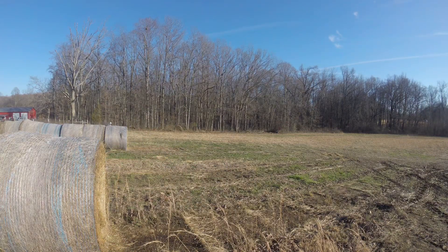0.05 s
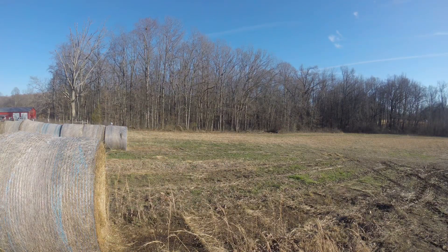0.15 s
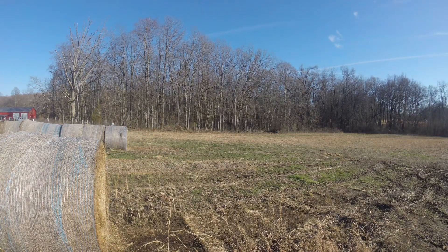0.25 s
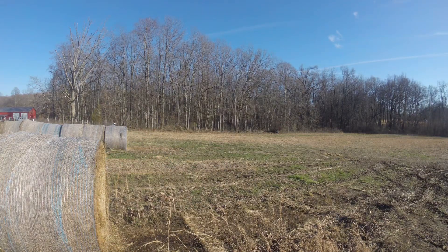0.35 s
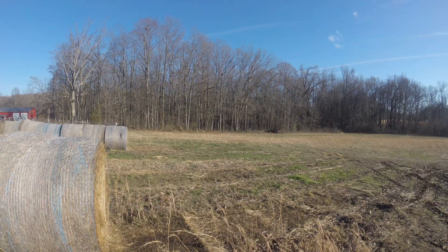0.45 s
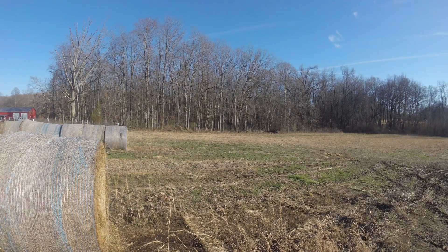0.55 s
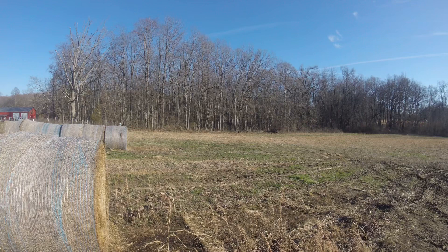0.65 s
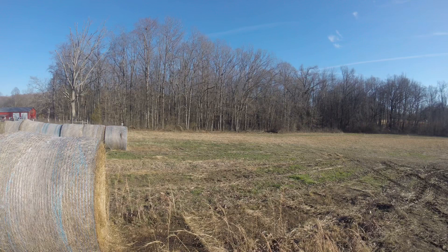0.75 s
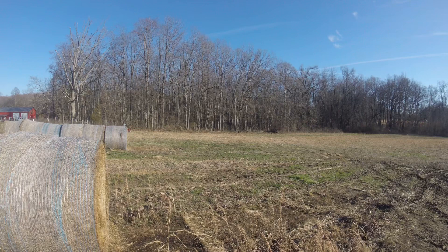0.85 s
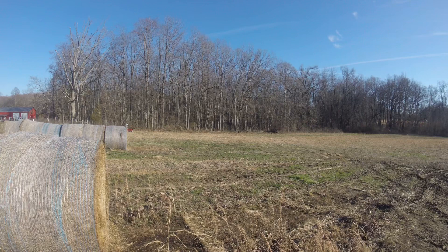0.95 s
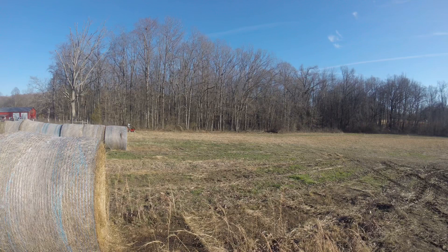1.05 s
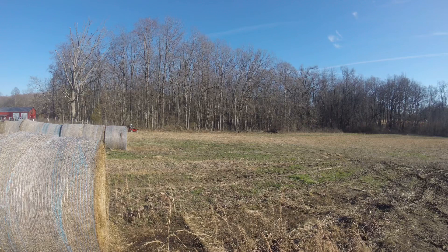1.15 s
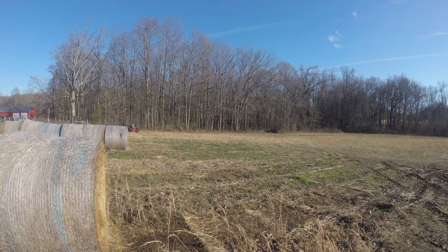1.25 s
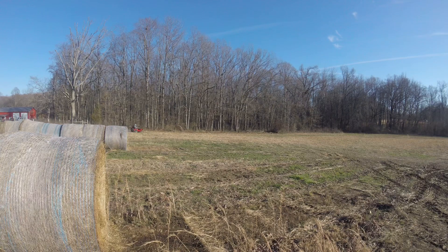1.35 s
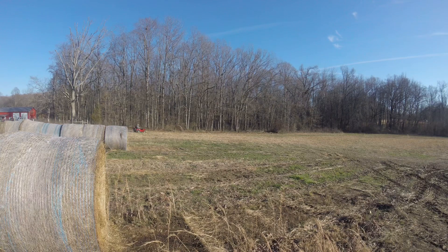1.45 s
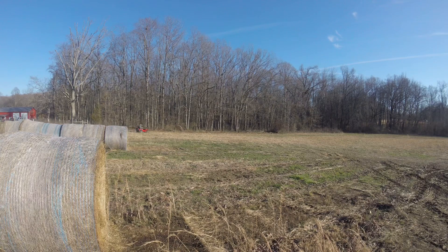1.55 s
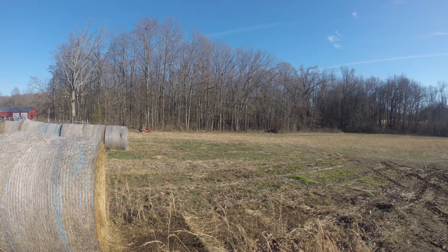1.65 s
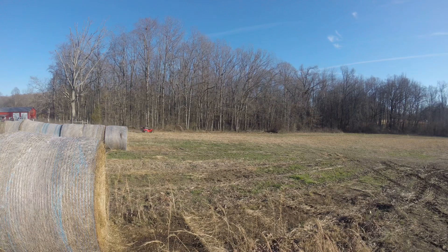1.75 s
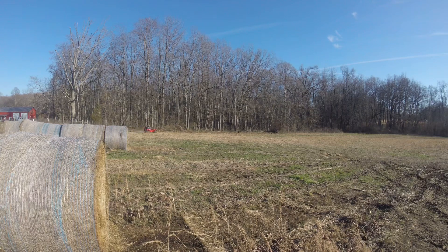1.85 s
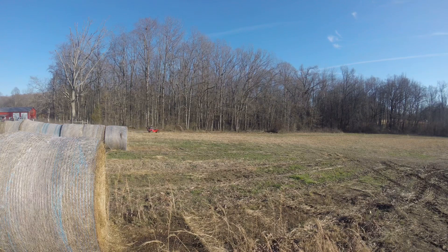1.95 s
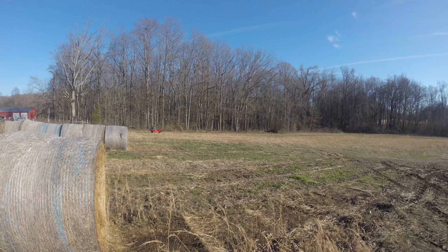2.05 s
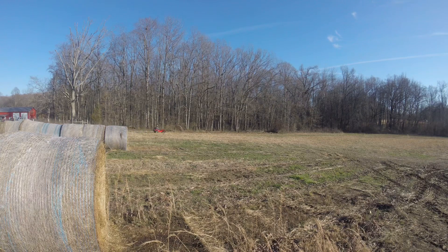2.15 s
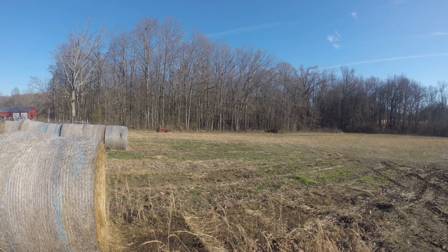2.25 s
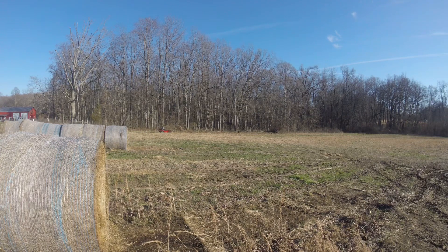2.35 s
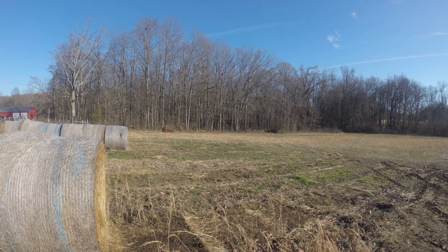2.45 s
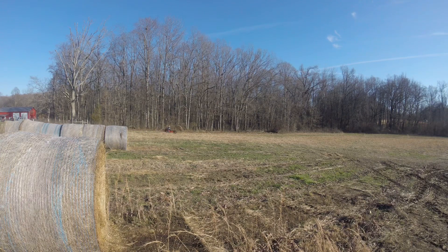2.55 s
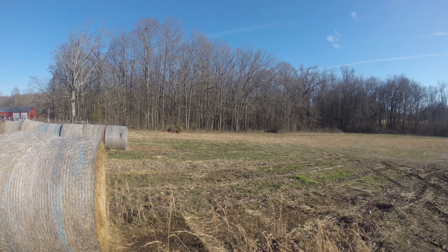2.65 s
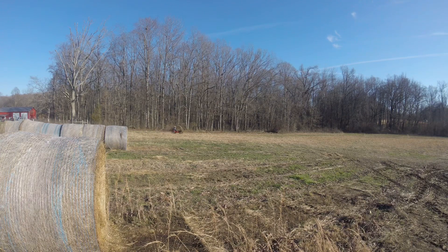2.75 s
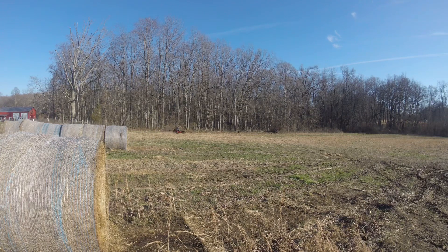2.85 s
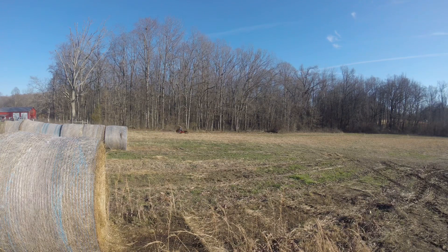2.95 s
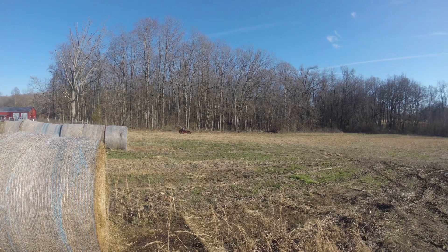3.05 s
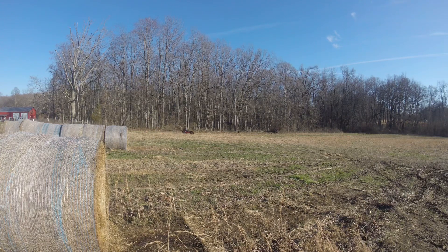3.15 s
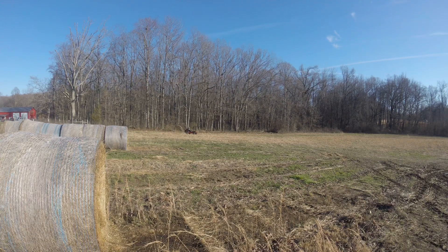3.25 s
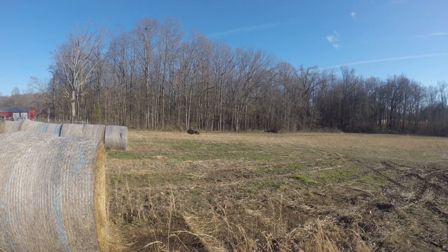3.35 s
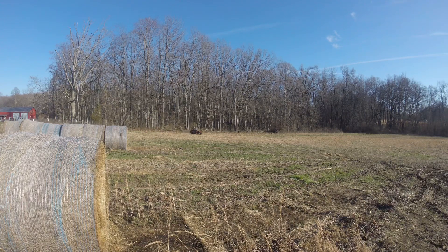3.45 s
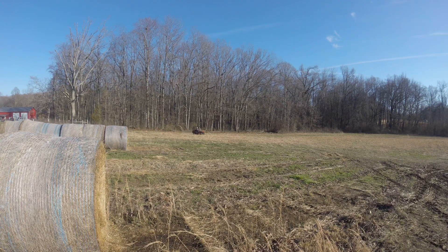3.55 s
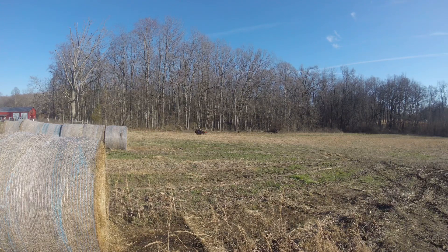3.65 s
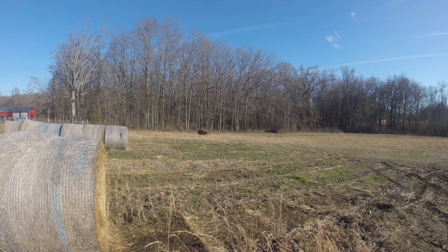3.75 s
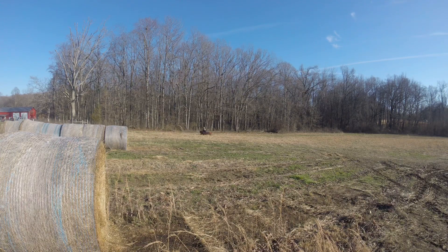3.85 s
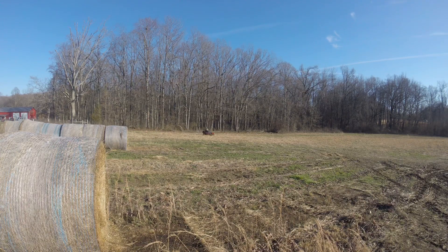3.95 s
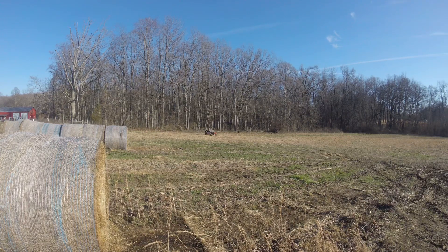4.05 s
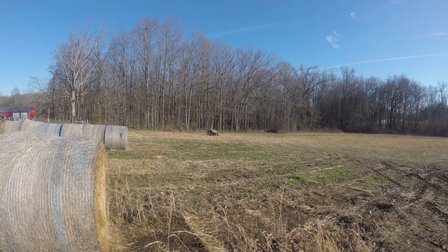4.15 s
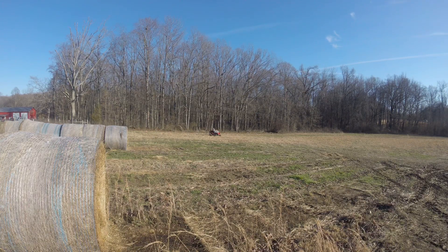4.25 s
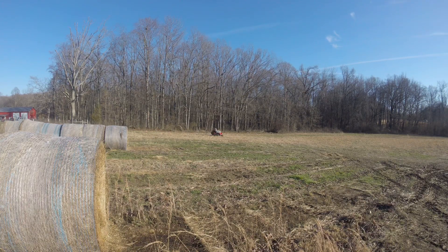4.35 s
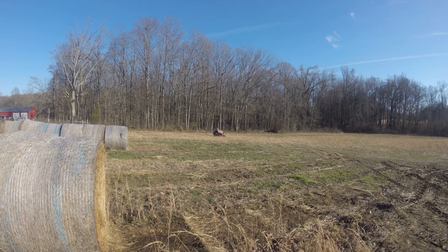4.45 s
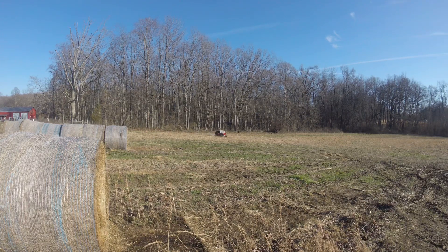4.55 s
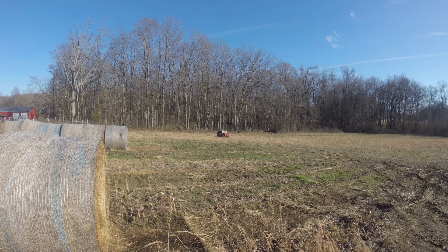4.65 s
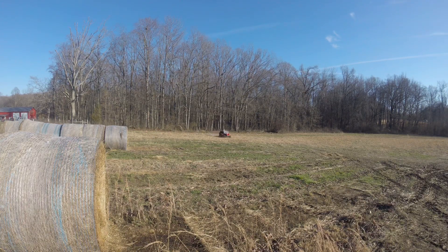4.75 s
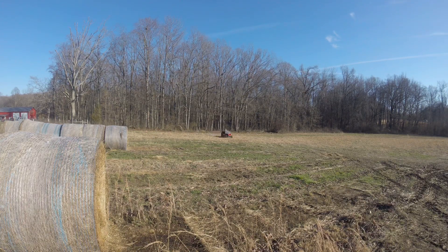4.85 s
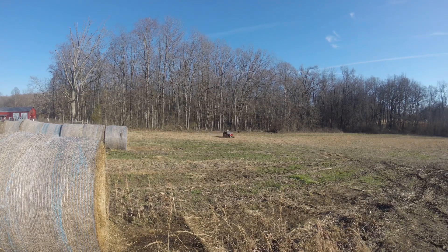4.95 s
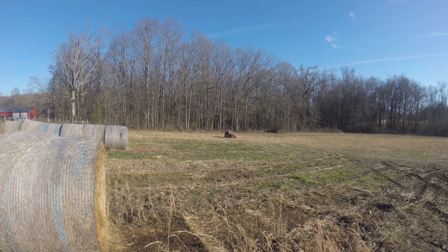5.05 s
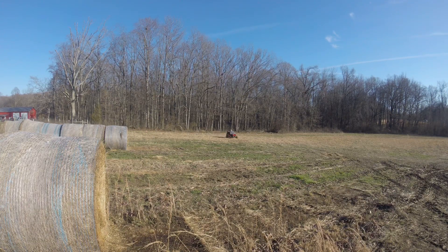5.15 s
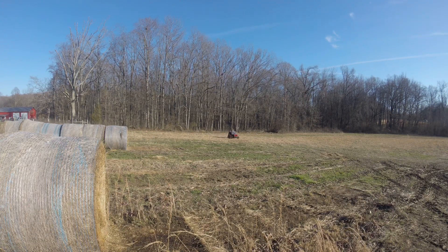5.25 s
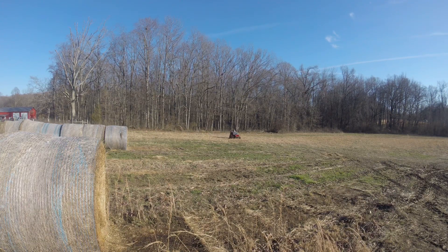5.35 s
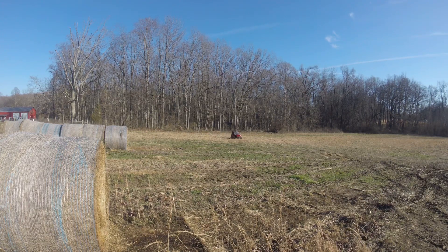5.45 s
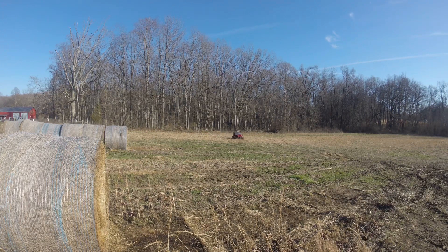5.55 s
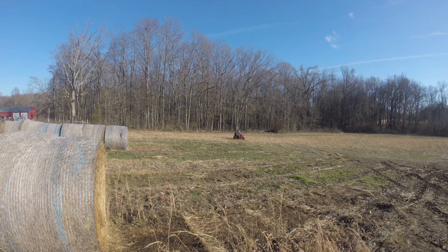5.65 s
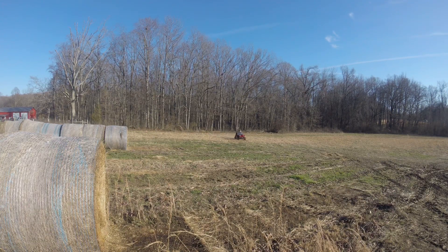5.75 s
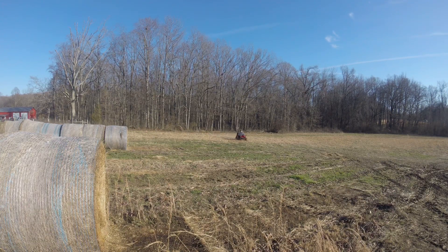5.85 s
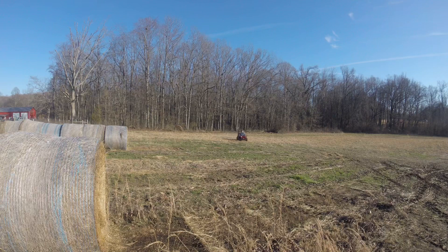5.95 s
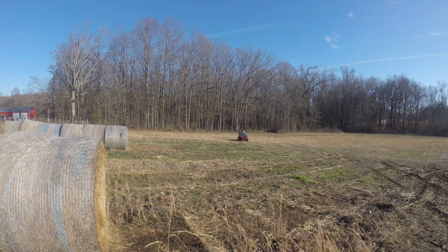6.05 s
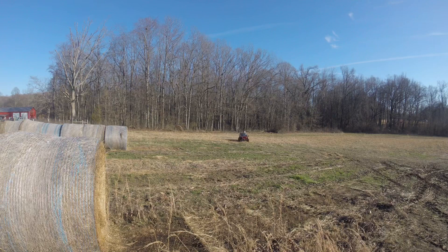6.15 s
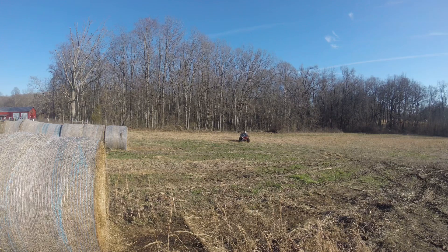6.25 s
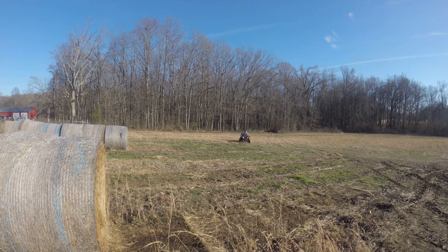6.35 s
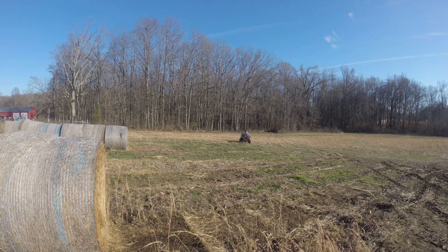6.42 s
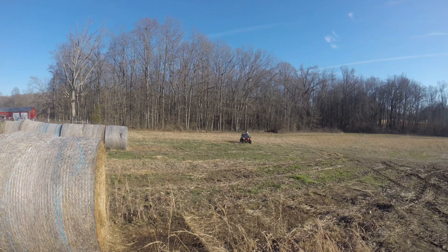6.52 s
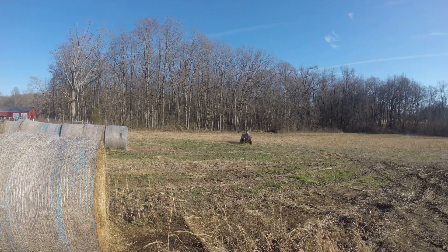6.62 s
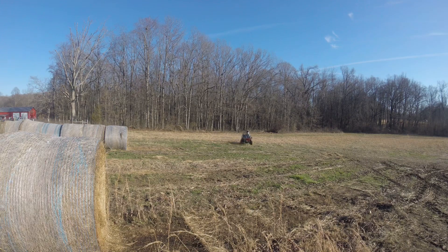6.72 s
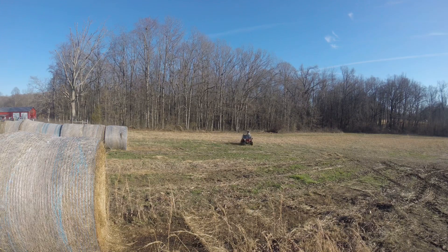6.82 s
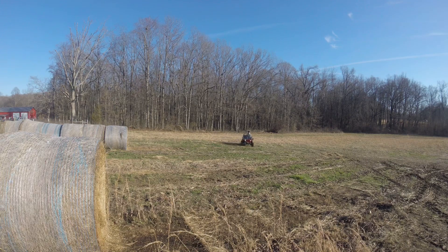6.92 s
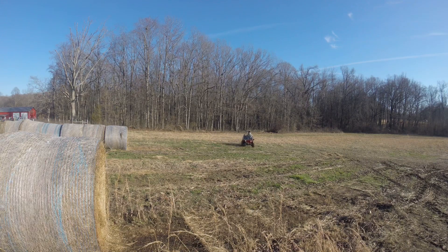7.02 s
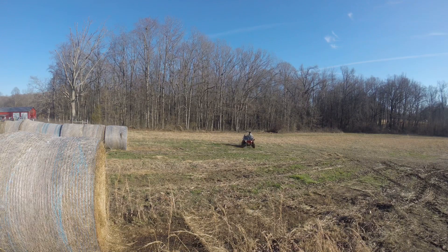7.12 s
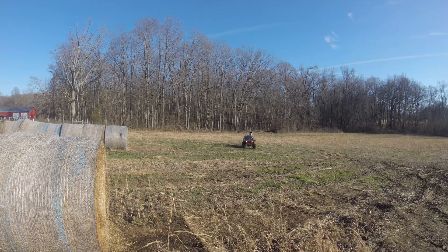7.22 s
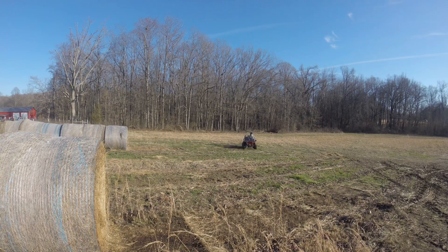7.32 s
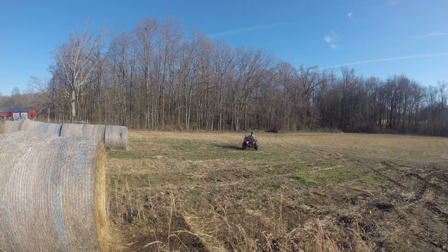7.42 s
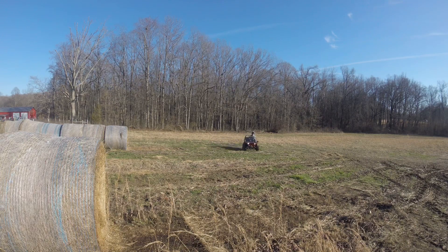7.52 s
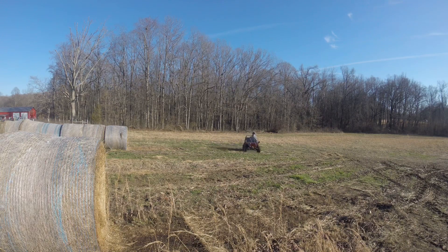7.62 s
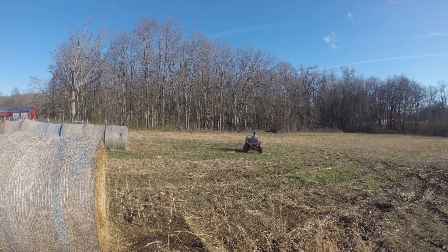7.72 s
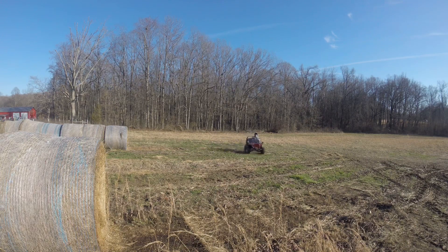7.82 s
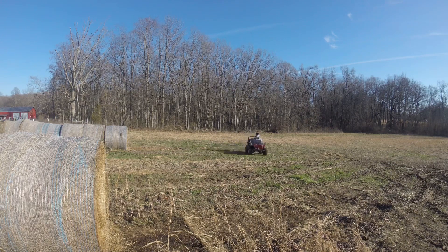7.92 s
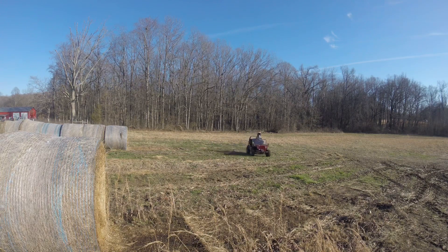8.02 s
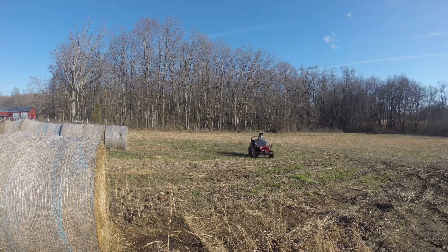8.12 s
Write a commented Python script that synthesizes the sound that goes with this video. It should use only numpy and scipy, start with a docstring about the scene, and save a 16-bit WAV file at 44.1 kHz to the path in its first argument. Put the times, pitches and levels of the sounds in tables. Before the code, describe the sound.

Distant quad engine putters unevenly over ruts, sagging and flaring, then revs higher and comes closer with swelling bass, rasp and mechanical hiss.

```python
"""Single-cylinder quad bike engine: it rounds a tree line on a soft field, turns and drives towards a small camera.
Each firing thumps through the exhaust as phase-locked orders plus gas roar, bass and rumble.
Cylinder rasp, intake hiss and tyre fizz are filtered noise that beats once a cycle; a valve tick rings.
The camera's low cut holds the bass down until the engine is close. Quiet field air lies beneath."""
import sys
import numpy as np
from scipy import signal
from scipy.fft import rfft, irfft, next_fast_len
from scipy.io import wavfile
from scipy.ndimage import uniform_filter1d, map_coordinates

SR = 44100
rng = np.random.default_rng(int(sys.argv[2]) if len(sys.argv) > 2 else 0)


def to_wav(sig):
    """Store sig (one row per channel, or 1-D mono) as 16-bit WAV at the path in sys.argv[1].

    Samples outside -1..1 are clipped; the rate is SR.
    """
    pcm = np.clip(np.atleast_2d(sig), -1, 1) * 32767
    pcm = np.round(pcm).astype(np.int16)
    wavfile.write(sys.argv[1], SR, pcm.T)  # frames by channels


N = 360738
TIME_S = np.arange(N) / SR


def amp(db):
    """Gain of a level in dB."""
    return 10 ** (np.asarray(db) / 20)


def unit(x):
    """x scaled to rms 1."""
    return x / np.sqrt(np.mean(x ** 2) + 1e-20)


def steady(x):
    """x with its level over several firings held at rms 1."""
    power = uniform_filter1d(uniform_filter1d(x ** 2, size=9000), size=9000)
    return x / np.sqrt(np.abs(power) + 1e-12)


def curves(rows):
    """One value per sample for each column after the time."""
    start_s, *columns = np.transpose(rows)
    return [np.interp(TIME_S, start_s, column) for column in columns]


def wobble(rate_hz):
    """Smooth random curve, rate_hz knots a second."""
    knots = rng.standard_normal(int(N * rate_hz / SR) + 4)
    return map_coordinates(knots, [np.arange(N) * rate_hz / SR])


def bump(events, width_s, late_s=0):
    """Bell of the given height at each event."""
    return sum(height * np.exp(-((TIME_S - start_s - late_s) / width_s) ** 2) for start_s, height in events)


def coloured(x, points):
    """x through the causal minimum-phase filter with the (Hz, dB) points as its gain."""
    m = 2 * next_fast_len(N // 2 + SR // 2)
    freq_hz, gain_db = np.transpose(points)
    bins_hz = np.fft.rfftfreq(m, 1 / SR)
    gain = amp(np.interp(np.log(bins_hz + 1), np.log(freq_hz + 1), gain_db))
    # folding the cepstrum forward makes the filter causal
    ceps = irfft(np.log(gain + 1e-4), m)
    ceps[1:m // 2] *= 2
    ceps[m // 2 + 1:] = 0
    return irfft(rfft(x, m) * np.exp(rfft(ceps)), m)[:N]


def patchy(depth_db):
    """White noise with time-frequency patches of random gain."""
    z = signal.stft(rng.standard_normal(N), nperseg=512)[2]
    field = rng.standard_normal(z.shape)
    field = uniform_filter1d(uniform_filter1d(field, size=6, axis=0), size=12, axis=1)
    return signal.istft(z * amp(depth_db * unit(field)), nperseg=512)[1][:N]


def per_firing(cycle):
    """New random number for each engine cycle, changing softly between the puffs."""
    draw = rng.standard_normal(int(cycle[-1]) + 2)[np.round(cycle).astype(int)]
    return uniform_filter1d(draw, size=250)


# engine speed, sagging and flaring as the wheels meet ruts: [start_s, firing_hz]
ENGINE_SPEED = [(0, 44.6), (.13, 46.2), (.27, 45.2), (.39, 41.23), (.49, 43.77), (.59, 41.7), (.72, 42.3),
                (.98, 41), (1.09, 43.14), (1.48, 44.28), (1.6, 38.77), (1.79, 44.83), (2.23, 42.88),
                (2.35, 47.4), (2.45, 39.2), (2.6, 45.28), (2.98, 44.14), (3.13, 45.1), (3.29, 39.2),
                (3.45, 47.46), (3.67, 41.77), (3.89, 44.4), (3.97, 38.43), (4.01, 39.2), (4.1, 44.22),
                (4.31, 39.82), (4.54, 44.03), (4.68, 40.98), (4.9, 45.96), (5.0, 43.48), (5.22, 46.73),
                (5.38, 45.96), (5.58, 49.8), (5.67, 48.43), (5.9, 49.35), (6.0, 48.36), (6.11, 50.5),
                (6.29, 51.1), (6.52, 49.98), (6.67, 54.6), (6.79, 50.45), (6.88, 50.6), (6.99, 53.29),
                (7.22, 54.6), (7.34, 52.9), (7.45, 54.62), (7.56, 52.95), (7.7, 54.21), (7.88, 54.48),
                (7.97, 50.84), (8.18, 51.47)]
CRUISE_MEAN_S, RISE_MEAN_S = 0.43, 0.098


def engine():
    """Speed in Hz, its excess over the running mean in Hz, and its smoothed rise in Hz a second."""
    speed_hz = curves(ENGINE_SPEED)[0]
    surge_hz = speed_hz - uniform_filter1d(speed_hz, round(CRUISE_MEAN_S * SR))
    rise_hz_per_s = uniform_filter1d(np.gradient(speed_hz) * SR, round(RISE_MEAN_S * SR))
    return speed_hz, surge_hz, rise_hz_per_s


# relative order levels as the bike changes heading, each: [order, relative_db]
HIDDEN_ORDERS = [(3, -7.5), (4, 3.5), (5, 1.5), (6, -2), (7, -4.5), (8, -15), (9, -35), (10, -33),
                 (11, -44), (12, -49)]
CROSSING_ORDERS = [(3, -17), (4, 0), (5, 6), (6, 1), (7, -3.5), (8, -13), (9, -23), (10, -18), (11, -27.5),
                   (12, -32.5)]
TURNING_ORDERS = [(3, -11.5), (4, -2.5), (5, 0), (6, -2), (7, -11), (8, -24), (9, -14.5), (10, -19),
                  (11, -28.5), (12, -17.5), (13, -19.5), (14, -32)]
COMING_ORDERS = [(3, 0.5), (4, 0), (5, -8), (6, 0.5), (7, -14), (8, -8.5), (9, -10), (10, -19.5),
                 (11, -21.5), (12, -22), (13, -21.5), (14, -29), (15, -32), (16, -33), (17, -22), (18, -20),
                 (19, -18), (20, -29), (21, -27), (22, -32)]
CLOSE_ORDERS = [(3, -7), (4, -6), (5, -6.5), (6, -8), (7, -8.5), (8, -18.5), (9, -17), (10, -16),
                (11, -25.5), (12, -31), (13, -31.5), (14, -31.5), (15, -40), (16, -28.5), (17, -26.5),
                (18, -34), (19, -28.5), (20, -36), (21, -37), (22, -29)]
# when each heading is heard pure: [start_s]
HEADING_START_S = [.9, 2.4, 4.6, 6, 7.2]


def order_db(k):
    """Level of one order over time, blended from heading to heading."""
    headings = (HIDDEN_ORDERS, CROSSING_ORDERS, TURNING_ORDERS, COMING_ORDERS, CLOSE_ORDERS)
    return np.interp(TIME_S, HEADING_START_S, [dict(orders).get(k, -70) for orders in headings])


# slow colour of the exhaust note: [start_s, orders_3_to_6_tilt_db_per_order, upper_orders_lift_db]
NOTE_COLOUR = [(0, -1.5, -2), (.6, -0.5, -2.5), (1.4, 0, 2), (2.0, 4, 2), (2.5, 2.5, 2.5), (3.1, -1, -4.5),
               (3.5, -0.5, 4), (4.4, 1.5, -2.5), (5.3, 0, 1), (6.3, 0, -2), (6.55, 1, -3),
               (6.68, 0.7, -1.5), (6.82, -0.5, -4.5), (7.0, -0.2, 2), (7.87, -1, 1), (7.98, 0, -2.5),
               (8.18, -0.5, -3)]
# deep ruts drag the engine down and the low orders boom: [start_s, boom_db_per_order]
LUG_EVENTS = [(.56, 3.5), (1.6, 6.5), (2.43, 5.5), (3.975, 9.5)]
# closeness of the bike: [start_s, nearness_0_to_1]
NEARNESS = [(0, 0.16), (4.3, 0), (5.3, 0.48), (6, 0.97), (8.18, 0.99)]
LUG_WIDTH_S, PULL_LATE_S = 0.038, 0.035
REBOUND_SHARE = 0.19  # the boom then climbs the orders: share of the lean, reversed
TILT_DB_PER_ORDER_PER_HZ_PER_S = 0.03
BARK_DB_PER_HZ, BARK_NEAR_EXTRA = 0.07, 0.96  # extra share at full nearness


def pipe_note(turn_rad):
    """Exhaust puffs: orders 3-22 of the firing rate, phase-locked with a small waver."""
    _, surge_hz, rise_hz_per_s = engine()
    near = curves(NEARNESS)[0]
    tilt_db, bark_db = curves(NOTE_COLOUR)
    tilt_db = tilt_db + TILT_DB_PER_ORDER_PER_HZ_PER_S * rise_hz_per_s
    tilt_db = tilt_db - bump(LUG_EVENTS, LUG_WIDTH_S)
    tilt_db = tilt_db + REBOUND_SHARE * bump(LUG_EVENTS, LUG_WIDTH_S, 2 * PULL_LATE_S)
    bark_db = bark_db + BARK_DB_PER_HZ * (1 + BARK_NEAR_EXTRA * near) * surge_hz
    spread_rad = .03 + .07 * near  # close by, the higher orders arrive later
    lean_rad = -1.2 * near  # keeps a pressure peak ahead of each suction trough
    note = np.zeros(N)
    for k in range(3, 23):
        lift_db = bark_db if k > 6 else tilt_db * (k - 5)
        # air and ground make every order waver on its own
        phase_rad = k * turn_rad + lean_rad - spread_rad * k * k + .4 * wobble(7)
        level_db = order_db(k) + lift_db + 1.4 * wobble(6)
        note += amp(level_db) * np.cos(phase_rad)
    return note


# gas roar in the pipe: [freq_hz, relative_db]
ROAR_SPECTRUM = [(71, -54), (120, -14.5), (161, -3), (215, -8), (264, -6), (345, -9), (545, -20),
                 (700, -46), (910, -72), (1540, -120)]


def pipe_roar(turn_rad):
    """Exhaust turbulence: noise swelling once a firing, coloured by the pipe."""
    gust = 1 + 0.41 * np.cos(turn_rad - .6)
    return coloured(rng.standard_normal(N) * gust, ROAR_SPECTRUM)


# how far the camera's low cut is engaged: [start_s, engaged_0_to_1]
LOW_CUT_ENGAGED = [(0, 0.87), (5.3, 1), (5.6, 0), (8.18, 0)]
LOW_CUT_HZ = 134.3


def low_cut(x):
    """Steep high-pass without delay, faded out as the cut opens."""
    engaged = curves(LOW_CUT_ENGAGED)[0]
    sos = signal.butter(8, LOW_CUT_HZ, "highpass", fs=SR, output="sos")
    return engaged * signal.sosfiltfilt(sos, x) + (1 - engaged) * x


# two lowest orders as the low cut lets them through: [start_s, first_order_db, second_order_db]
BASS_LEVELS = [(0, -69, -65), (.35, -66, -58), (.9, -74, -69), (1.4, -74, -71), (3, -76, -71),
               (5.0, -74, -65), (5.28, -72, -63), (5.47, -51, -41), (6.15, -34.5, -27), (6.6, -30, -23),
               (7.1, -25, -20), (8.18, -23, -16.5)]
# low roar under the bass: [freq_hz, relative_db]
RUMBLE_SPECTRUM = [(10, -27), (25, 10), (70, 4), (120, 10), (170, -36.5)]


def bass_orders(turn_rad, size):
    """First and second firing orders, their strength varying with each firing."""
    first_db, second_db = curves(BASS_LEVELS)
    first = amp(first_db + 1.0 * wobble(5)) * np.cos(turn_rad - 3.2)
    second = amp(second_db + 1.2 * wobble(5)) * np.cos(2 * turn_rad - 1.05)
    return np.sqrt(2) * size * (first + second)  # sqrt(2): levels are rms


def rumble():
    """Low filtered noise that follows the first order's level."""
    first_db = curves(BASS_LEVELS)[0]
    return amp(first_db - 8.5) * unit(coloured(rng.standard_normal(N), RUMBLE_SPECTRUM))


# base levels as the bike clears the bales and comes near:
# [start_s, exhaust_db, cylinder_rasp_db, intake_hiss_db, tyre_fizz_db]
APPROACH_LEVELS = [(0, -36, -57, -70, -70), (1.0, -38, -60, -67.5, -72), (1.28, -34.5, -53, -56.5, -68.5),
                   (1.36, -37, -50, -53, -68), (1.55, -35.5, -51.5, -55.5, -70),
                   (2.1, -34, -51.5, -56.5, -69.5), (2.5, -33, -53, -58.5, -70), (2.66, -32, -50, -54, -68),
                   (3.3, -31, -52.5, -58, -70), (3.52, -31.5, -50, -54.5, -69.5),
                   (3.9, -31.5, -53, -59, -69.5), (4.2, -31, -49.5, -53, -63.5),
                   (5.0, -27.5, -46, -48, -61.5), (5.3, -27, -40, -44.5, -59.5),
                   (5.8, -24.5, -38, -40.5, -58), (6.3, -23.5, -37, -36.5, -53.5),
                   (6.9, -22.5, -36, -36.5, -55.5), (7.5, -20.5, -34, -35.5, -52),
                   (7.7, -21, -34.5, -34, -51), (7.85, -18.5, -31.5, -37.5, -47.5),
                   (7.98, -21.5, -33.5, -38.5, -51), (8.18, -19.5, -34, -37, -46)]
# running: [start_s, firing_unevenness_db, roar_db_re_note, noise_beating_share_0_to_1]
RUNNING = [(0, 1.8, -5, .15), (1, 1.5, -8, 0.45), (2, 0.9, -11.5, 0.27), (4, 0.9, -12, .25),
           (5.2, 1.0, -9.5, 0.33), (6, 0.7, -7, 0.57), (7, 1.0, -6.5, .65), (8.18, 1.1, -5, 0.55)]
# weak firings: [start_s, gain_db]
WEAK_FIRINGS = [(.49, -24)]
PIPE_DB_PER_HZ = 0.2  # level rise per Hz of surge
WAVER_DB = 0.6  # random swell
PULL_RATIO, SWELL_WIDTH_S = 0.5, 0.047  # late swell, dB per (dB per order) of boom


def exhaust(cycle):
    """One puff a cycle, each a little early or late, strong or weak, over bass and rumble."""
    pipe_db = curves(APPROACH_LEVELS)[0] + PIPE_DB_PER_HZ * engine()[1] + WAVER_DB * wobble(8)
    pipe_db = pipe_db + PULL_RATIO * bump(LUG_EVENTS, SWELL_WIDTH_S, PULL_LATE_S)
    pipe_db = pipe_db + bump(WEAK_FIRINGS, width_s=0.01)
    uneven_db, roar_db, _ = curves(RUNNING)
    size = amp(uneven_db * per_firing(cycle))
    turn_rad = 2 * np.pi * (cycle + .003 * uneven_db * per_firing(cycle))
    note = steady(size * pipe_note(turn_rad))
    roar = amp(roar_db) * steady(pipe_roar(turn_rad))
    return low_cut(amp(pipe_db) * (note + roar)) + bass_orders(turn_rad, size) + rumble()


def beat(cycle, strength, lag_cycles, decay_cycles):
    """Sudden start and exponential decay once a cycle."""
    decay = np.exp(-((cycle - lag_cycles) % 1) / decay_cycles)
    return strength * uniform_filter1d(decay, size=70)


# cylinder noise close by: [freq_hz, relative_db]
NEAR_CYLINDER_SPECTRUM = [(400, -54), (600, -5), (800, -16.5), (900, -11), (1560, -13.5), (1830, -11.5),
                          (2150, -10.5), (2880, -14.5), (3240, -13.5), (4340, -21), (4600, -20),
                          (5980, -27), (10100, -120)]
# cylinder noise far off: [freq_hz, relative_db]
FAR_CYLINDER_SPECTRUM = [(350, -25.5), (600, 0.5), (699, -4.5), (984, 1.5), (1430, -8.5), (1930, -4.5),
                         (2350, -7.5), (3220, -7.5), (4300, -15.5), (4600, -12), (5980, -14), (10100, -120)]


def cylinder_rasp(cycle, strength, share):
    """Patchy noise beating once a cycle, with a sharper knock close by."""
    near = curves(NEARNESS)[0]
    envelope = 1 - 0.5 * share + share * beat(cycle, strength, 0.079, 0.37)
    envelope = envelope + 1.2 * share * near * beat(cycle, strength, 0.024, 0.05)
    knock = patchy(depth_db=1.0) * envelope
    close = steady(coloured(knock, NEAR_CYLINDER_SPECTRUM))
    far = steady(coloured(knock, FAR_CYLINDER_SPECTRUM))
    return near * close + (1 - near) * far


# intake noise: [freq_hz, relative_db]
INTAKE_SPECTRUM = [(2470, -35), (4200, -8), (4370, -8.5), (5150, 2.5), (5680, 1), (6290, 0), (6780, -10.5),
                   (7600, -16.5), (9880, -60), (16700, -120)]


def intake_hiss(cycle, strength, share):
    """Beating intake noise plus a valve tick that rings at a slightly new pitch each cycle."""
    envelope = 1 - 1.05 * share + 1.25 * share * beat(cycle, strength, 0.034, 0.14)
    hiss = coloured(patchy(depth_db=1.5) * envelope, INTAKE_SPECTRUM)
    ring_hz = 5700 + 380 * per_firing(cycle - .3)
    ring = np.sin(2 * np.pi * np.cumsum(ring_hz) / SR)
    tick = beat(cycle, strength, 0.016, 0.039) * ring
    return steady(steady(hiss) + 1.02 * share * steady(tick))


# tyres in dry grass: [freq_hz, relative_db]
FIZZ_SPECTRUM = [(4120, -41), (7000, -3.5), (7780, -3.5), (10400, -8.5), (11200, -16.5), (14600, -50),
                 (22000, -120)]


def tyre_fizz(cycle, strength, share):
    """Patchy high noise from tyres in dry grass, pulsing with the firing."""
    envelope = 1 + 1.8 * share * beat(cycle, strength, .02, 0.059)
    return steady(coloured(patchy(depth_db=3.0) * envelope, FIZZ_SPECTRUM))


RASP_DB_PER_HZ, HISS_DB_PER_HZ, FIZZ_DB_PER_HZ = 0.5, 0.4, 0.2  # level rise per Hz of surge


def mechanics(cycle):
    """Cylinder, intake and tyre noise, brighter as the engine flares."""
    surge_hz = engine()[1]
    _, rasp_db, hiss_db, fizz_db = curves(APPROACH_LEVELS)
    share = curves(RUNNING)[2]
    strength = amp(1.2 * per_firing(cycle))
    shake_db = .5 * wobble(8)  # ruts shake the whole machine
    rasp_gain = amp(rasp_db + RASP_DB_PER_HZ * surge_hz + shake_db)
    hiss_gain = amp(hiss_db + HISS_DB_PER_HZ * surge_hz + shake_db)
    fizz_gain = amp(fizz_db + FIZZ_DB_PER_HZ * surge_hz)
    rasp = rasp_gain * cylinder_rasp(cycle, strength, share)
    hiss = hiss_gain * intake_hiss(cycle, strength, share)
    return rasp + hiss + fizz_gain * tyre_fizz(cycle, strength, share)


# field air and microphone hiss: [freq_hz, relative_db]
AIR_SPECTRUM = [(15, -68), (25, -36), (86, -55), (143, -2), (190, -8), (492, -27), (1730, -30.5),
                (4260, -62), (5100, -45), (9690, -48.5), (11600, -50), (15100, -88), (22000, -120)]


def field_air():
    """Quiet patchy noise of field air and microphone hiss."""
    return amp(-43.5) * unit(coloured(patchy(depth_db=1.1), AIR_SPECTRUM))


def scene():
    """Engine over quiet field air."""
    cycle = np.cumsum(engine()[0]) / SR
    return (exhaust(cycle) + mechanics(cycle) + field_air())[None]


BAND_LIMIT_HZ = 11150


def record(dry):
    """Camera band limit: above it the level falls 1 dB every 10 Hz."""
    m = next_fast_len(N + SR // 2)
    over_hz = np.clip(np.fft.rfftfreq(m, 1 / SR) - BAND_LIMIT_HZ, 0, None)
    return irfft(rfft(dry, m) * amp(-over_hz / 10), m)[:, :N]


dry = scene()
out = record(dry)
to_wav(out)
```